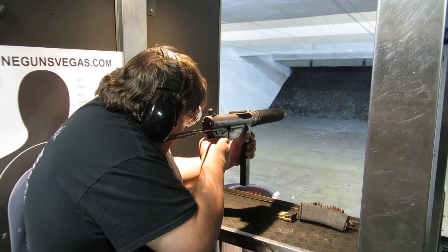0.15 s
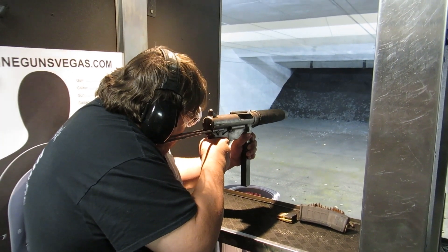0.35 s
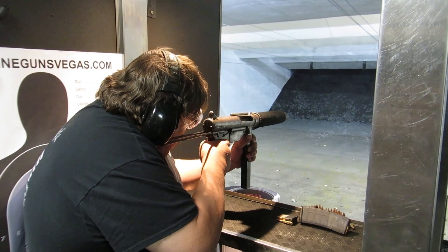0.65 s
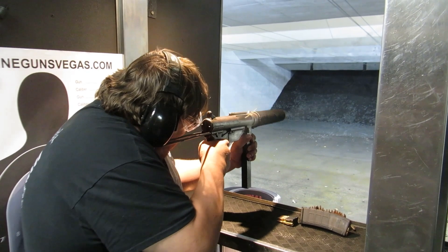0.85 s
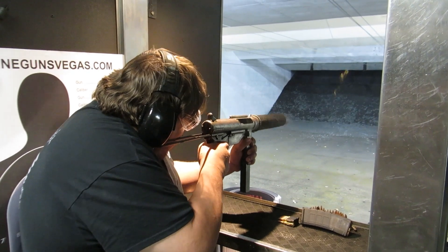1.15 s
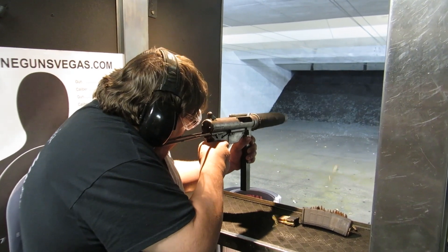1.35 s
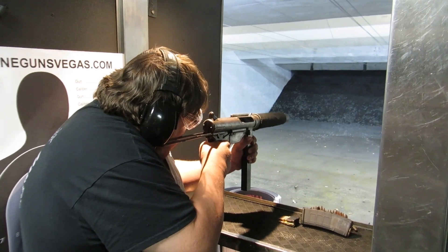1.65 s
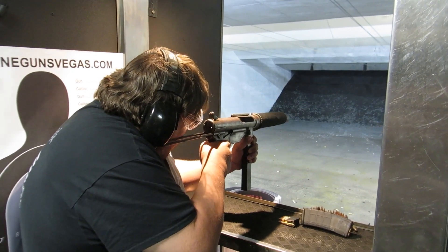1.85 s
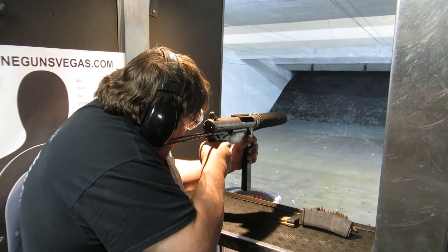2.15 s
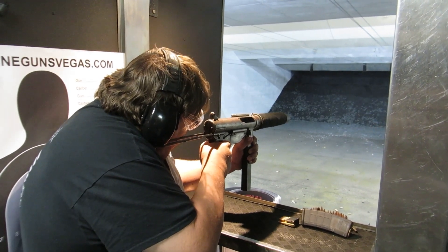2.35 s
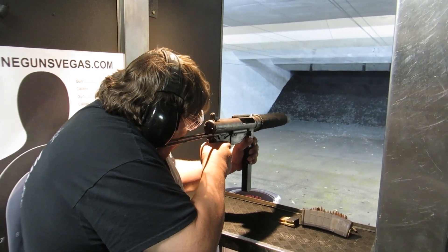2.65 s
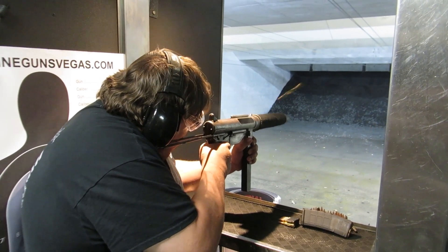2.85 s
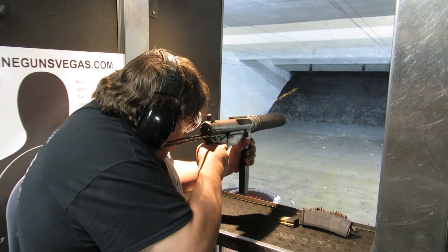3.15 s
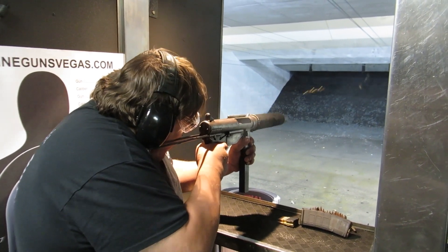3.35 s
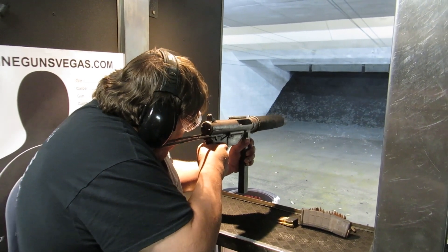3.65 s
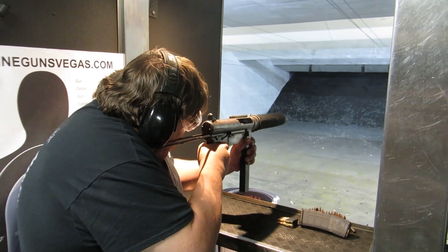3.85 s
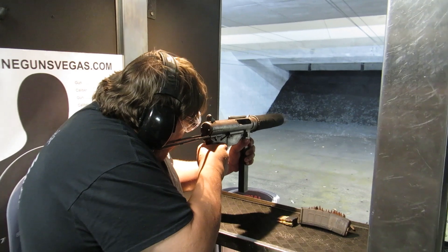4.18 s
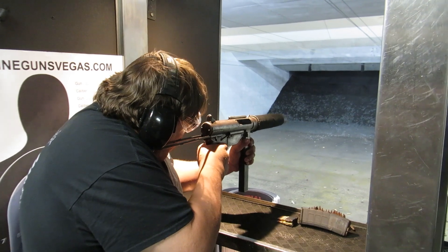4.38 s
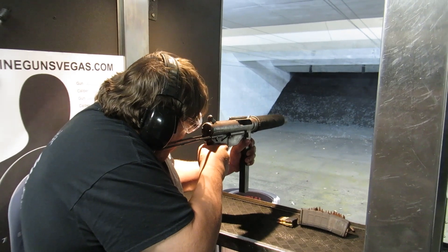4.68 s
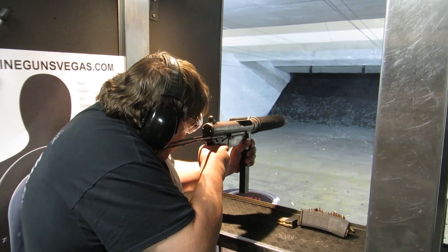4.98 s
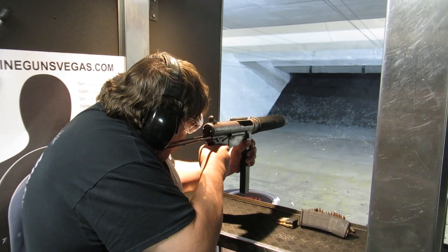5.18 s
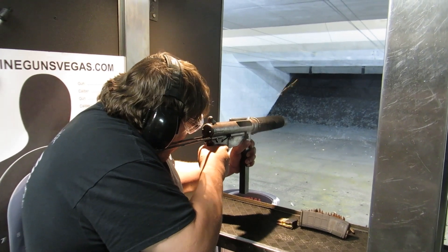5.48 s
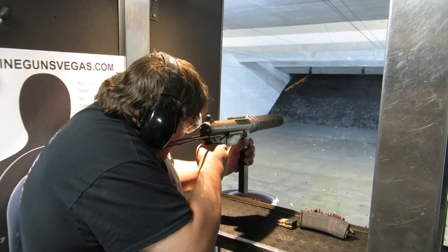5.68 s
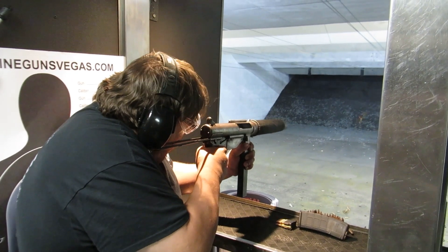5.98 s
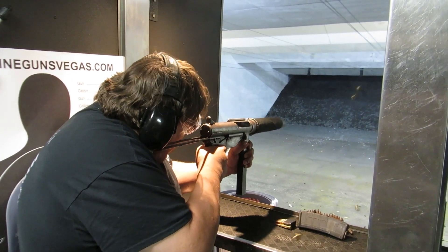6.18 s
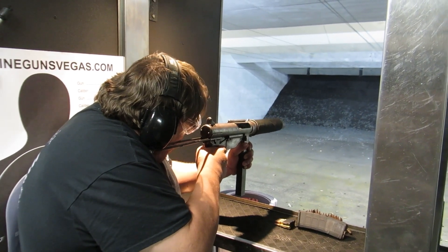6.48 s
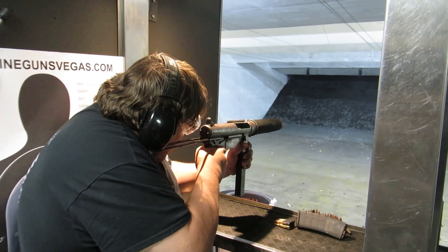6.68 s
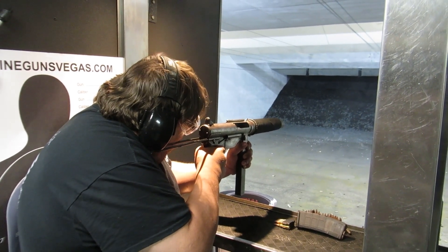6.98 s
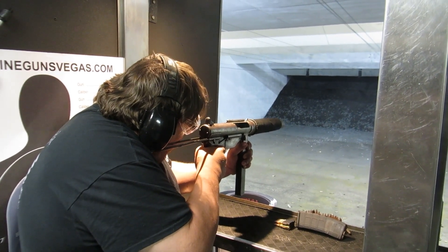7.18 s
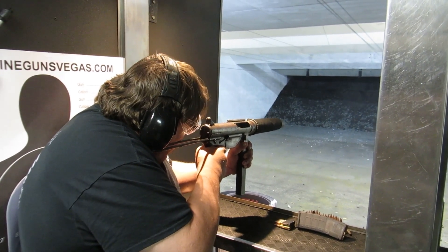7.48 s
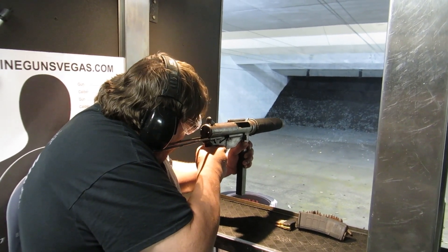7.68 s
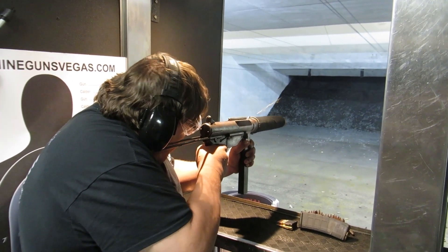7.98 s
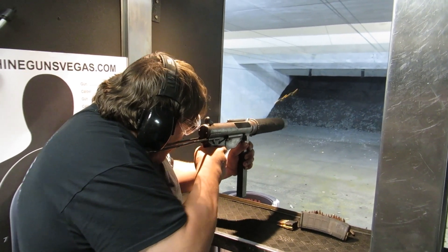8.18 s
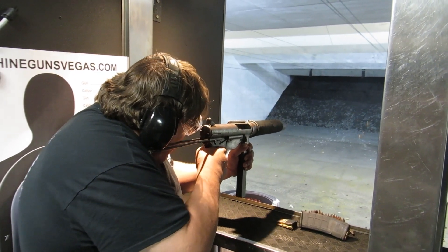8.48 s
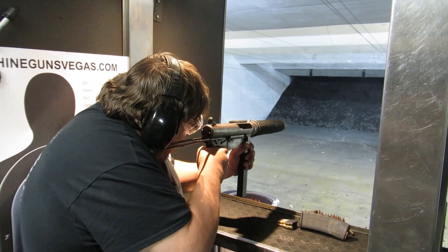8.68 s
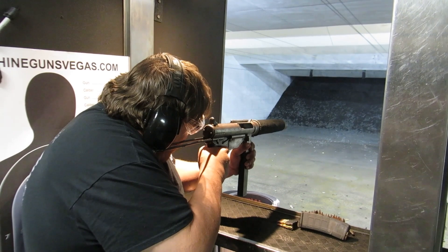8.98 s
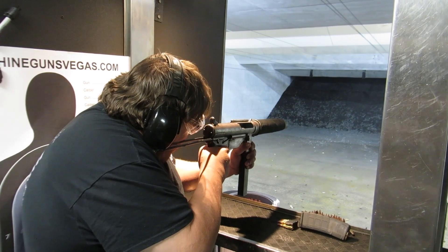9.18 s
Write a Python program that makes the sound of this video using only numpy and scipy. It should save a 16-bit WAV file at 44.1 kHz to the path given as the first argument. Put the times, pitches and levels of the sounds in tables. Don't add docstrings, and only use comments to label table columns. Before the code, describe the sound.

Smooth duct rumble and airy vent hiss fill a hard concrete range, heard in close stereo. In the first half second brass cases roll, tick and ring brightly. At 0.8 s a suppressed submachine gun fires two rounds: short pops fused with a hard steel bolt slam, then rattling recoil. The bolt catches at 1.0 and a bright echo decays for over a second while the ambience ducks and slowly recovers. Cases knock the bench at 1.4-1.5 and clink around 2.1; one strikes ringing sheet steel at 2.45. Four rounds follow at 2.9-3.3, then a long faint, singing case roll from 3.7 to 6, with soft low draughts. Three rounds fire at 5.5-5.8. Cases knock at 6.0-6.9, land with a flat slap at 7.15 and roll brightly. The last three rounds, starting loudest, come at 7.9-8.2; echo fades into small brass knocks until 9.3.

```python
import sys
import numpy as np
from scipy import signal
from scipy.fft import rfft, irfft, next_fast_len
from scipy.io import wavfile
from scipy.ndimage import uniform_filter1d

SR = 44100
rng = np.random.default_rng(int(sys.argv[2]) if len(sys.argv) > 2 else 0)


def dump_mix(stems):
    frames = np.atleast_2d(stems).T
    limited = np.clip(frames, -1, 1)
    pcm = np.round(limited * 32767).astype(np.int16)
    wavfile.write(sys.argv[1], SR, pcm)


def ratio(d):
    e = np.asarray(d, float) / 20
    return 10 ** e


N = 411894
SIZE = next_fast_len(N + 2 * SR)
HZ = np.maximum(np.arange(SIZE // 2 + 1) * SR / SIZE, 1)


def at_hz(points, hz=HZ):
    table = np.array(points)
    return np.interp(np.log(hz), np.log(table[:, 0]), table[:, 1])


def rms_one(x):
    return x / np.sqrt(np.mean(x ** 2) + 1e-20)


def colour(x, gain):
    return irfft(rfft(x, SIZE) * gain, SIZE)[..., :N]


def shape(points):
    inside = (HZ > points[0][0] * .7) * (HZ < points[-1][0] * 1.02)
    return ratio(at_hz(points)) * inside


def hump(hz, width_hz):
    return 1 / np.sqrt(1 + ((HZ - hz) / (width_hz / 2)) ** 2)


def grit(spread_db):
    return rng.standard_normal(N) * ratio(spread_db * np.minimum(rng.exponential(1, N), 4))


def coloured_noise(gain):
    return rms_one(colour(rng.standard_normal(N), gain))


def coloured_grit(spread_db, gain):
    return rms_one(colour(grit(spread_db), gain))


def drift(rate_hz):
    return coloured_noise(hump(0, 2 * rate_hz) ** 2)


def add(out, s, piece):
    i = round(s * SR)
    out[i:i + len(piece)] += piece[:N - i]


def clatter(hits, gain, spread_db, rise_s, hold_s, offset_db, low_t60=9, lumps_db=0):
    body = rfft(grit(spread_db), SIZE) * gain
    low = 1 / (1 + (HZ / 2200) ** 6)
    high = 1 / (1 + (5500 / HZ) ** 6)
    bands = np.array([rms_one(irfft(body * g, SIZE)[:N]) for g in (low, 1 - low - high, high)])
    if lumps_db:
        bands = bands * ratio(lumps_db * np.array([drift(70) for _ in bands]))
    out, t = np.zeros(N), np.arange(SR // 3) / SR
    fade = ratio(-60 * t / max(low_t60, .01) * np.array([[1], [0], [0]]))
    for s, db, low_db, high_db, t60 in hits:
        i = round(s * SR)
        decay_db = -60 * np.maximum(t - hold_s, 0) / max(t60, .01)
        env = np.minimum(t / rise_s, 1) * ratio(db + offset_db + decay_db)
        shares = ratio(np.array([low_db, 0, high_db]))
        noise = shares @ (bands[:, i:i + len(t)] * fade[:, :N - i])
        add(out, s, noise * env[:N - i])
    return out


def rings(hits, split_hz, offset_db):
    out, t = np.zeros(N), np.arange(SR // 2) / SR
    for (s, db, hz, t60), luck in zip(hits, rng.normal(0, 1, (len(hits), 3))):
        tone = sum(np.sin(2 * np.pi * (hz + split_hz * u) * t) for u in luck)
        env = np.minimum(t / 0.00075, 1) * ratio(db + offset_db - 2.5 - 60 * t / max(t60, .02))
        add(out, s, tone * env)
    return out


def sung(hits, hz, width_hz, rise_s, offset_db):
    env, t = np.zeros(N), np.arange(SR) / SR
    for s, db, t60 in hits:
        add(env, s, np.minimum(t / rise_s, 1) * ratio(db + offset_db - 60 * t / max(t60, .02)))
    return env * coloured_grit(3.3, hump(hz, width_hz) ** 2)


def after(times, levels_db, contact):
    return [(s + contact[0], db, *contact[1:]) for s, db in zip(times, levels_db)]


OPEN_DB, DUCK_DB = 0.87, -13
DUCK_S, RECOVER_S = 0.087, 0.35
START_DUCKED_S = -1.6


def gain_control():
    ends = [(START_DUCKED_S, 2)] + [(burst[-1][0], len(burst)) for burst in BURSTS]
    end, count = np.transpose(ends)[..., None]
    late = np.maximum(np.arange(N) / SR - end, 0)
    dips = (1 - np.exp(-late / DUCK_S)) * np.exp(-late / (RECOVER_S * count))
    return OPEN_DB + DUCK_DB * np.max(dips, axis=0)


# (frequency [Hz], level [dB per Hz])
DUCT_RUMBLE = [(12, -30), (20, -3.5), (60, -2), (215, -0.5), (282, -1.5), (499, -2.5), (600, -12),
               (780, -51), (1320, -120)]
# (frequency [Hz], level [dB per Hz])
VENT_HISS = [(240, -13), (400, -15), (456, -2.5), (569, -3), (1130, -2), (2410, 0), (4510, -6), (6250, -8),
             (6940, -9.5), (7500, -8.5), (9000, -13.5), (11700, -44), (19800, -120)]
RUMBLE_DB, HISS_DB = -52, -43


def ventilation():
    rumble = ratio(RUMBLE_DB) * coloured_noise(shape(DUCT_RUMBLE))
    hiss = ratio(HISS_DB + .8 * drift(6)) * coloured_noise(shape(VENT_HISS))
    duct = ratio(HISS_DB - 13.5 + 2.4 * drift(4)) * coloured_noise(hump(2440, 200) ** 2)
    return ratio(gain_control()) * (rumble + hiss + duct)


WALL_HZ, MOUTH_HZ = 7643, 4340
# (time [s], length [s], wall ring at start [dB], at end [dB])
ROLLING_CASES = [
    (0.0, 0.37, -30, -67),
    (1.3, 0.27, -32, -69),
    (2.05, .4, -68, -47),
    (3.71, 2.4, -53, -45),
    (6.55, .55, -60, -58),
    (7.24, 0.71, -39, -35),
    (8.748, 0.5, -56, -45),
]


def rolling():
    t, level_db = np.arange(N) / SR, np.full(N, -90.)
    for s, length, start_db, end_db in ROLLING_CASES:
        times = [s - .02, s, s + length, s + length + .05]
        level_db = np.maximum(level_db, np.interp(t, times, [-90, start_db, end_db, -90]))
    return ratio(level_db - 14.0 + 3.9 * drift(25)) * coloured_grit(3.2, hump(WALL_HZ, 70) ** 2)


# (frequency [Hz], level [dB per Hz])
RUSTLE_COLOUR = [(3000, -27), (6000, -20), (9000, -1), (12000, 0), (15500, -8.5)]
RUSTLE_DB, RUSTLE_KNEE_DB, RUSTLE_SLOPE = -52, -2, 1.4


def rustling():
    level_db = RUSTLE_DB + RUSTLE_SLOPE * np.minimum(gain_control() - RUSTLE_KNEE_DB, 0)
    lower = ratio(level_db - 9 + 5.0 * drift(7)) * coloured_grit(4.0, hump(6290, 110) ** 2)
    upper = sum(ratio(level_db - 19 + 5.0 * drift(7)) * coloured_grit(4.0, hump(hz, 90) ** 2)
                for hz in (11100, 11820))
    rustle = ratio(level_db - 2.0 + 2.4 * drift(22)) * coloured_grit(4.9, shape(RUSTLE_COLOUR))
    return lower + upper + rustle


# (frequency [Hz], level [dB per Hz])
BRASS_COLOUR = [(300, -28), (600, -2), (1200, 5.5), (2500, 1), (4500, -1), (7000, -2.5), (10000, -6.5),
                (15500, -19)]
# (time [s], middle band peak [dB], fall by 60 dB [s])
TICKS = [(0.0967, -16, 0.097), (0.0994, -25.5, 0.11), (0.4384, -36, 0.021), (0.5105, -21.5, 0.098),
         (1.5824, -46, 0.055), (1.6644, -52, 0.049), (1.9174, -39, 0.24), (2.0867, -32, 0.07),
         (2.1056, -23.5, 0.088), (3.7194, -33, 0.12), (3.897, -32.5, 0.28), (4.0886, -34, 0.076),
         (4.4694, -36, 0.07), (4.585, -37, 0.062), (5.2794, -37, 0.07), (6.6702, -36, 0.045),
         (6.0375, -17.5, 0.058), (8.721, -37, 0.07), (8.876, -32, 0.12)]
# (time [s], middle band peak [dB], fall by 60 dB [s])
PINGS = [
    (0.2894, -48, 0.057),
    (0.462, -42, 0.07),
    (1.2, -46, .04),
    (1.585, -48, 0.036),
    (6.215, -44, 0.036),
    (2.472, -30.5, 0.023),
    (6.7904, -45, 0.048),
    (7.478, -46, 0.07),
]
# (time [s], middle band peak [dB], fall by 60 dB [s])
SMACKS = [
    (1.4944, -17.5, 0.082),
    (2.4516, -18.5, 0.29),
    (2.4578, -21.5, 0.12),
    (2.4827, -18, 0.068),
    (6.4337, -28, 0.19),
    (6.5294, -34, 0.07),
    (9.3157, -30.5, 0.11),
]
# (time [s], middle band peak [dB], fall by 60 dB [s])
SLAPS = [
    (7.1575, -12.5, 0.093),
    (7.168, -22.5, 0.27),
]
# (time [s], middle band peak [dB], fall by 60 dB [s])
THUDS = [
    (1.1974, -29, 0.055),
    (1.422, -33, 0.091),
    (6.2123, -26.5, 0.094),
    (9.2525, -35.5, 0.12),
]
# (time [s], middle band peak [dB], fall by 60 dB [s])
CLACKS = [
    (2.6575, -27, 0.024),
    (6.924, -22.5, 0.039),
    (8.9605, -24.5, 0.14),
]
# (low re middle [dB], high re middle [dB])
TICK, PING, SMACK = (-15.5, 5.9), (-35, 20.6), (-5.5, -2.4)
SLAP, THUD, CLACK = (-7, -3.5), (8, -11), (-19, -10)


def case_knocks():
    kinds = ((TICKS, TICK), (PINGS, PING), (SMACKS, SMACK), (SLAPS, SLAP), (THUDS, THUD), (CLACKS, CLACK))
    landings = [(s, db, *surface, t60) for rows, surface in kinds for s, db, t60 in rows]
    return clatter(landings, shape(BRASS_COLOUR), spread_db=4.6, rise_s=0.00057, hold_s=0.00062,
                   offset_db=-12.5)


# (time [s], peak [dB], fall by 60 dB [s])
WALL_RINGS = [(0.4624, -12, 0.064), (0.4844, -32, 0.15), (0.5114, -33, 0.16), (0.5182, -35, 0.16),
              (1.495, -37, 0.17), (2.0916, -30, 0.24), (2.134, -39, 0.2), (2.3595, -20.5, 0.074),
              (2.3994, -35, 0.52), (2.4728, -33, 0.11), (3.899, -38.5, 0.67), (4.0916, -41, 0.47),
              (4.4064, -42, 0.27), (4.4717, -36.5, 0.19), (4.5394, -48, 0.22), (4.6249, -38.5, 0.32),
              (4.7366, -42, 0.26), (4.994, -42, 0.65), (6.425, -44, 0.36), (6.6687, -36, 0.17),
              (6.793, -26, 0.12), (6.8164, -32, 0.2), (6.9316, -33.5, 0.25), (7.165, -35, 0.54),
              (8.7276, -35.5, 0.26), (8.8812, -37.5, 0.39), (8.961, -41, 0.33)]
# (time [s], peak [dB],
# frequency [Hz], fall by 60 dB [s])
FAINT_TONES = [(.104, -36, 7040, 0.19), (.465, -42, 11840, 0.31), (2.355, -47, 13550, 0.48),
               (2.392, -43, 11150, 0.25), (2.39, -45, 15000, .3), (2.37, -49, 9100, .3),
               (4.15, -54, 11800, .3), (4.39, -64, 13800, 0.96), (4.39, -65, 12050, .6),
               (4.81, -65, 15100, .5), (6.43, -45, 9400, 0.14), (6.68, -50, 11800, .3),
               (7.245, -44.5, 11150, 0.38), (7.245, -50, 15100, .5), (7.75, -53, 11150, 1.0),
               (7.75, -51, 15000, .5), (7.62, -59, 6300, .6), (7.79, -46, 6330, 0.6), (8.66, -66, 9800, .2),
               (9.15, -59, 9800, 0.26),
               (4.59, -55, 6800, .5),
    (5.15, -52, 6900, 0.34),
    (5.15, -51, 6050, .5),
    (5.35, -53, 11000, .2),
    (5.12, -52, 2450, .5),
    (5.25, -49, 2380, .5),
    (9.06, -55, 6300, .4),
    (9.19, -52, 6300, .4),
    (0.45, -50, 15300, .2),
]


def case_rings():
    walls = sung(WALL_RINGS, WALL_HZ, 125, 0.0021, -4.5)
    return walls + rings(FAINT_TONES, 31, -1.3)


# (time [s], peak [dB], fall by 60 dB [s])
MOUTH_RINGS = [
    (0.5115, -18, 0.081),
    (0.5264, -31.5, 1),
    (2.0867, -24.5, 0.14),
    (2.1046, -25, 0.4),
    (4.0901, -36, 0.56),
    (6.6702, -30, 0.079),
    (8.8757, -28.5, 0.36),
    (8.9605, -37, 0.53),
    (9.3137, -34, 0.15),
]
# (time [s], peak [dB], frequency [Hz], fall by 60 dB [s])
BENCH_KNOCKS = [(1.423, -34, 526, 0.038), (1.423, -31, 1880, 0.025), (1.423, -31, 1500, .025),
                (1.432, -32, 513, 0.061), (1.432, -30, 1700, .03), (1.495, -24.5, 1400, 0.032),
                (1.495, -31, 1650, 0.055), (1.497, -27, 3190, 0.026), (6.211, -24, 1326, 0.064),
                (6.211, -32, 1080, .04), (6.432, -32, 1860, 0.08), (6.432, -40, 1500, .05),
                (6.924, -33.5, 3950, 0.043), (6.922, -35, 3300, .03), (8.9605, -36, 3740, .06),
                (9.25, -37, 1150, 0.055), (9.25, -36, 747, 0.066), (9.25, -41, 2060, 0.043),
                (9.262, -47, 1250, .2), (9.30, -38, 1190, 0.11), (9.30, -45, 2400, .1)]
# (time [s], peak [dB], frequency [Hz], fall by 60 dB [s])
SHEET_STEEL = [(2.452, -22, 1750, 0.031), (2.453, -23, 2600, .03), (2.456, -20, 4560, 0.032),
               (2.457, -16, 3130, 0.021), (2.474, -33, 2560, 0.59), (2.474, -35, 4700, 0.45),
               (2.476, -25, 3830, 0.079), (2.476, -36, 3946, .35), (2.476, -36, 3063, 0.49),
               (2.476, -36, 4200, 0.45), (2.476, -40, 2320, .3), (2.476, -29.5, 3350, 0.44),
               (2.474, -37, 5626, .4), (2.473, -5.5, 7670, 0.016), (2.473, -14, 8160, .02),
               (2.473, -16, 9300, 0.02), (2.474, -16, 6660, 0.044), (2.483, -18, 7400, .04),
               (2.484, -20, 8400, .04), (2.658, -29, 3900, .03)]


def hollow_knocks():
    mouths = sung(MOUTH_RINGS, MOUTH_HZ, 550, 0.00074, -8.5)
    return mouths + rings(BENCH_KNOCKS, 78, -2.5) + rings(SHEET_STEEL, 80.3, -4.0)


# (frequency [Hz], fall by 60 dB [s])
ECHO_T60 = [(150, 0.17), (400, 1.08), (1000, 1.25), (2800, 1.47), (5000, 1.095), (8000, 0.71),
            (13000, 0.45)]
# (frequency [Hz], level [dB])
ECHO_COLOUR = [(200, 4), (600, 0), (1500, -0.5), (2800, 1.5), (4000, 0.5), (5000, 6.5), (6200, 4),
               (8000, 4.5), (14000, 1.5)]


def range_echo(x):
    t, tail = np.arange(2 * SR) / SR, 0
    white = rfft(rng.standard_normal(2 * SR))
    hz = np.maximum(np.arange(SR + 1) / 2, 1)
    for centre in 100 * 2 ** np.arange(0, 8, .5):
        band = irfft(white * np.clip(1 - 2 * abs(np.log2(hz / centre)), 0, 1))
        tail = tail + band * ratio(at_hz(ECHO_COLOUR, centre) - 60 * t / at_hz(ECHO_T60, centre))
    tail = tail * np.minimum(t / 0.017, 1)
    return colour(x, rfft(tail / np.sqrt(np.sum(tail ** 2)), SIZE))


# (frequency [Hz], level [dB per Hz])
STEEL_COLOUR = [(88, -58), (150, -42), (205, 10), (381, -12.5), (828, 2), (987, -2.5), (1110, -1),
                (1450, -0.5), (1840, -0.5), (2710, -8.5), (3990, -4), (5450, -5), (8680, 3), (13300, -3),
                (15600, -12)]
# (frequency [Hz], width [Hz], level [dB])
RECEIVER_MODES = [(800, 37, 1), (1150, 190, 0), (1300, 170, 4.5), (1750, 79, -0.5), (3540, 390, 3.5),
                  (4200, 500, 1.5), (5000, 500, 1), (6690, 890, 5), (8770, 810, 1.5)]


def receiver():
    modes = sum((ratio(db) - 1) * hump(hz, width) ** 2 for hz, width, db in RECEIVER_MODES)
    return shape(STEEL_COLOUR) / (1 + (330 / HZ) ** 4) * (1 + modes)


# (trigger [dB], sear [dB], stripping a round [dB])
BURST_STARTS = [
    (-16.5, -11, -7),
    (-27, -13, -13),
    (-19.5, -11, -7.5),
    (-18, -15, -8),
]
# (time from the first pop [s], low re middle [dB], high re middle [dB], fall by 60 dB [s])
PULL = (-0.0555, -3.5, -2.5, 0.053)
RELEASE = (-0.0257, -19, -9, 0.06)
STRIP = (-0.0125, -8, -5.5, 0.075)


def trigger_pulls(body):
    firsts = [burst[0][0] for burst in BURSTS]
    pulls = after(firsts, np.transpose(BURST_STARTS)[0], PULL)
    return clatter(pulls, body, spread_db=2.5, rise_s=0.01, hold_s=0.0056, offset_db=-12)


# (time [s], middle band peak [dB], fall by 60 dB [s])
SEAR_HOLDS = [
    (1.0337, -7.5, 0.1),
    (3.4295, -8.5, 0.072),
    (5.9041, -4, .032),
    (8.285, -3.5, 0.025),
]
# (time [s], middle band peak [dB], low re middle [dB])
BOLT_RATTLES = [(.859, -20, -3), (.886, -18, -9), (.997, -25, -5), (1.015, -15, -13), (2.944, -17, -3),
                (2.976, -23, -12), (3.092, -21, -7), (3.097, -19, -10), (3.117, -18, -4),
                (3.2321, -16, -10), (3.285, -13.5, -2), (3.3787, -17, -5), (3.4027, -11, -7),
                (5.574, -18, -7), (5.594, -20, -10), (5.713, -17, -5), (5.74, -15, -13), (5.855, -19, -7),
                (5.875, -17, -11), (7.9652, -17, -1), (7.9847, -13, -9), (8.0927, -15, -7),
                (8.121, -18, -8), (8.232, -17, -8), (8.255, -21, -10)]
RATTLE_HIGH_DB, RATTLE_T60_S = -5, 0.022
CATCH_LOW_DB, CATCH_HIGH_DB = -7, -6.5


def catches(body):
    firsts = [burst[0][0] for burst in BURSTS]
    _, release_db, strip_db = np.transpose(BURST_STARTS)
    hits = after(firsts, release_db, RELEASE) + after(firsts, strip_db, STRIP)
    hits = hits + [(s, db, low_db, RATTLE_HIGH_DB, RATTLE_T60_S) for s, db, low_db in BOLT_RATTLES]
    hits = hits + [(s, db, CATCH_LOW_DB, CATCH_HIGH_DB, t60) for s, db, t60 in SEAR_HOLDS]
    return clatter(hits, body, spread_db=1.5, rise_s=0.00029, hold_s=0.0061, offset_db=-14.5)


# (time [s], muzzle pop [dB], bolt slam middle [dB], its low re middle [dB], its fall by 60 dB [s])
BURSTS = [
    [(.7955, -7, -3.5, -10.5, .13), (.9335, -8.5, -5.5, -2.5, 0.15)],
    [(2.8803, -7.5, -2, -7, 0.099), (3.028, -11.5, -4.5, -7, 0.14), (3.170, -8.5, -6, -1.5, 0.11),
     (3.3161, -12.5, -5, -19, 0.12)],
    [(5.508, -7.5, -4, -4.5, 0.13), (5.6506, -12, -5.5, -10.5, .13), (5.7895, -10, -5.5, -9, 0.16)],
    [(7.9038, -4.5, -1, -10.5, 0.082), (8.0305, -12, -5.5, -4, 0.14), (8.17, -10.5, -5.5, -5, 0.15)],
]
ROUNDS = [shot for burst in BURSTS for shot in burst]
SLAM_HIGH_DB = -5.5
# (time [s], middle [dB], low re middle [dB], high re middle [dB])
RECOILS = [(.8462, -11.5, -16, -9), (.9844, -12, -12, -10), (2.932, -12, -11.5, -8.5),
           (3.0782, -11.5, -13, -7.5), (3.2223, -11.5, -14, -9.5), (3.3672, -12, -14.5, -10),
           (5.56, -10.5, -12.5, -8.5), (5.7023, -13, -13.5, -9.5), (5.8415, -11.5, -12, -9),
           (7.9564, -12, -13.5, -8), (8.0834, -13.5, -10.5, -10.5), (8.2222, -12.5, -16, -6.5)]
RECOIL_T60_S, UNLOCK_DB, UNLOCK_T60_S = 0.33, -2.5, 0.042


def bolt_slams(body):
    hits = [(s - .0012, db, low_db, SLAM_HIGH_DB, t60) for s, _, db, low_db, t60 in ROUNDS]
    hits = hits + [(s, db + UNLOCK_DB, low_db, high_db, UNLOCK_T60_S) for s, db, low_db, high_db in RECOILS]
    return clatter(hits, body, spread_db=1.0, rise_s=.0004, hold_s=0.0043, offset_db=-10, low_t60=0.26)


# (time [s], rocked apart [dB], pushed together [dB])
JOLTS = [
    (.7955, -8, -9),
    (2.8803, -8, -20),
    (3.3161, -16, -18),
    (5.508, -12, -1.5),
]
NUDGE = (-33, -44)
# (frequency [Hz], level [dB], fall by 60 dB [s])
CAN_MODES = [(836, -10, 0.064), (1150, 5, 0.01), (1250, -9, .05), (1700, -7, 0.052), (550, -1.5, 0.013)]
POP_CUT_HZ = 150


def muzzle():
    out, rock, push, t = np.zeros(N), np.zeros(N), np.zeros(N), np.arange(SR // 3) / SR
    lead = .001

    def cycle(lag):
        return (1 - 2 * ((t - lag) / 0.00027) ** 2) * np.exp(-((t - lag) / 0.00029) ** 2)

    late = np.maximum(t - lead, 0)
    crack = -np.exp(-((t - lead + 0.00035) / .00005) ** 2)
    blast = cycle(lead) + ratio(-5.0) * cycle(lead + 0.00175) + ratio(2.0) * crack
    sway = np.sin(2 * np.pi * 58 * late) * np.minimum(late / 0.0077, 1)
    shake = ratio(-54.5 - 60 * late / 0.4) * sway
    lucks = rng.normal(0, 1.0, (len(ROUNDS), len(CAN_MODES)))
    for (s, db, *_), luck in zip(ROUNDS, lucks):
        choices = JOLTS + [(s - .01, *NUDGE)]
        _, rock_db, push_db = min(choices, key=lambda jolt: abs(jolt[0] - s))
        can = sum(ratio(d + e - 60 * late / t60) * np.sin(2 * np.pi * hz * late)
                  for (hz, d, t60), e in zip(CAN_MODES, luck))
        add(out, s - lead, ratio(db) * (blast + ratio(-12.5) * can))
        add(rock, s - lead, ratio(rock_db) * (late / 0.00031) * np.exp(1 - late / 0.00043))
        add(push, s - lead, ratio(push_db) * (late / 0.0005) * np.exp(1 - late / 0.00023) + shake)
    return colour(out, 1 / (1 + (POP_CUT_HZ / HZ) ** 4)), rock, push


# (time after the pop [s], peak [dB], frequency [Hz], fall by 60 dB [s])
EJECTOR = (.064, -16.5, 1920, 0.0268)


def bolt_recoils(body):
    runs = [(*run, RECOIL_T60_S) for run in RECOILS]
    rattle = clatter(runs, body, spread_db=2.0, rise_s=0.00039, hold_s=0.035, offset_db=-10.0, lumps_db=2.0)
    kicks = [(s + EJECTOR[0], *EJECTOR[1:]) for s, *_ in ROUNDS]
    return rattle + rings(kicks, 122, -3.5)


# (time [s], length [s], level [dB])
GUSTS = [
    (2.52, 0.39, -60),
    (3.82, .32, -49),
    (4.25, 0.62, -52),
    (4.95, 0.66, -55),
    (7.4, .4, -65),
]
GUST_HZ = 45


def draught():
    t = np.arange(N) / SR
    env = sum(ratio(db) * np.sin(np.pi * np.clip((t - s) / length, 0, 1)) for s, length, db in GUSTS)
    return env * ratio(2.9 * drift(8)) * coloured_noise(hump(0, 2 * GUST_HZ) ** 2 * (HZ > 15))


# (frequency [Hz], side re mid [dB])
SIDE_DB = [(60, -12), (200, -11), (400, -12), (700, -11.5), (1300, -13.5), (2400, -15), (4400, -12.5),
           (8000, -9), (15000, -2.5)]
# (frequency [Hz], side re mid [dB])
AIR_SIDE_DB = [(60, -10), (110, -15), (200, -12.5), (380, -15), (700, -11), (1290, -14.5), (2380, -16),
               (4400, -9.5), (8120, -15), (15000, -2)]
# (frequency [Hz], left re right [dB])
LEFT_DB = [(300, 1), (1300, .3), (4400, 1), (8000, 2.8), (15000, 5.5)]
ROCK_CUT_HZ = 75


def scene():
    brass, hollow = rolling() + rustling() + case_knocks() + case_rings(), hollow_knocks()
    body = receiver()
    pop, rock, push = muzzle()
    weapon = trigger_pulls(body) + catches(body) + bolt_slams(body) + pop + bolt_recoils(body)
    feed = ratio(-6.5) * weapon + ratio(-7.5) * brass + ratio(-14) * hollow
    brass = brass + hollow
    mid = weapon + brass + push + range_echo(feed) + ventilation()
    i = np.arange(500)
    scatter = rfft(rng.standard_normal(500) * np.exp(-i / 150) * (i > 25) / 8, SIZE)
    scatter = scatter / np.sqrt(uniform_filter1d(np.abs(scatter) ** 2, size=5000))
    early = colour(weapon + brass, scatter)
    side = colour(early + range_echo(feed), ratio(at_hz(SIDE_DB)))
    side = side + colour(ventilation(), ratio(at_hz(AIR_SIDE_DB)))
    lean = np.tanh(at_hz(LEFT_DB) * np.log(10) / 40)
    side = side + colour(mid, lean) - colour(rock, 1 / (1 + (ROCK_CUT_HZ / HZ) ** 2)) + draught()
    return np.array([mid + side, mid - side])


def low_pass(x):
    return signal.sosfilt(signal.butter(12, 15700, fs=SR, output="sos"), x)


def record(dry):
    flat = dry / (1 + np.abs(dry) ** 8) ** (1 / 8)
    top = signal.cheby2(14, 40, 16150, fs=SR, output="sos")
    mix = signal.sosfilt(top, flat)
    return low_pass(mix)


dry = scene()
out = record(dry)
dump_mix(out)
```